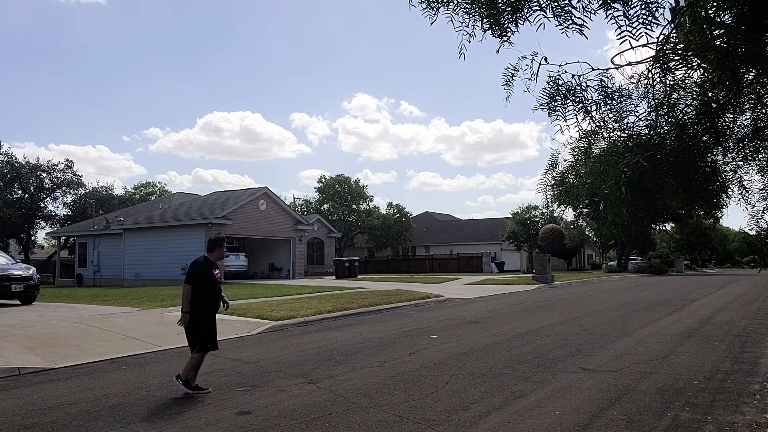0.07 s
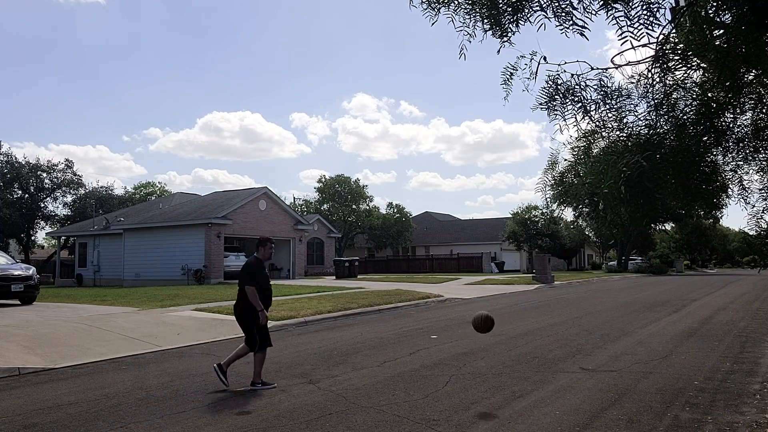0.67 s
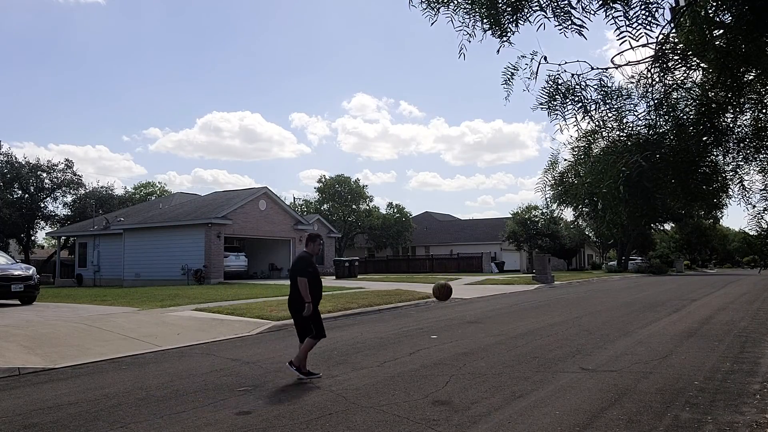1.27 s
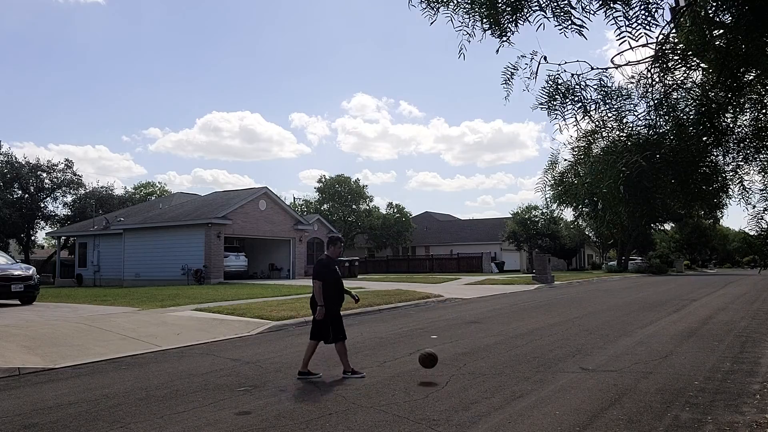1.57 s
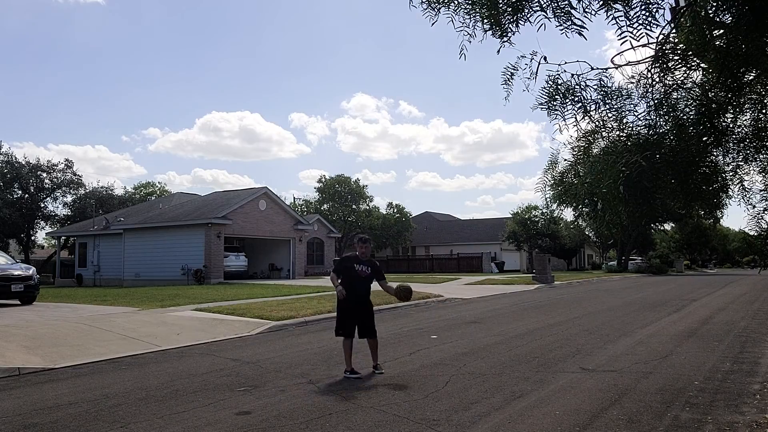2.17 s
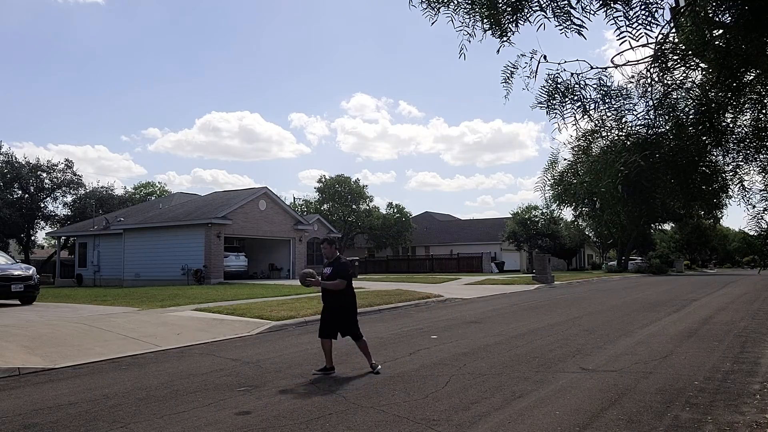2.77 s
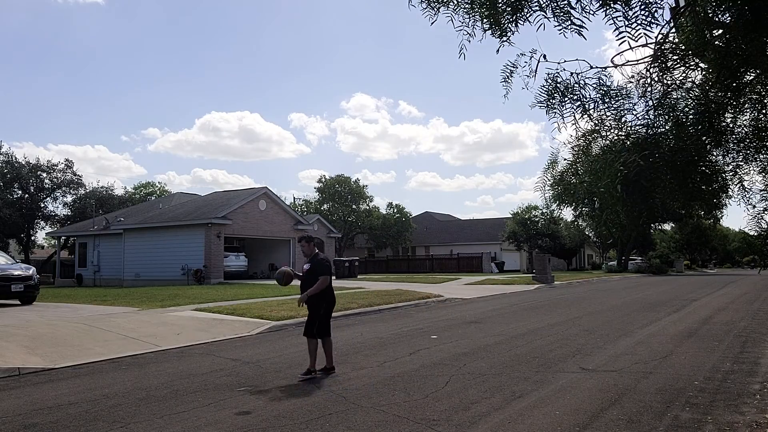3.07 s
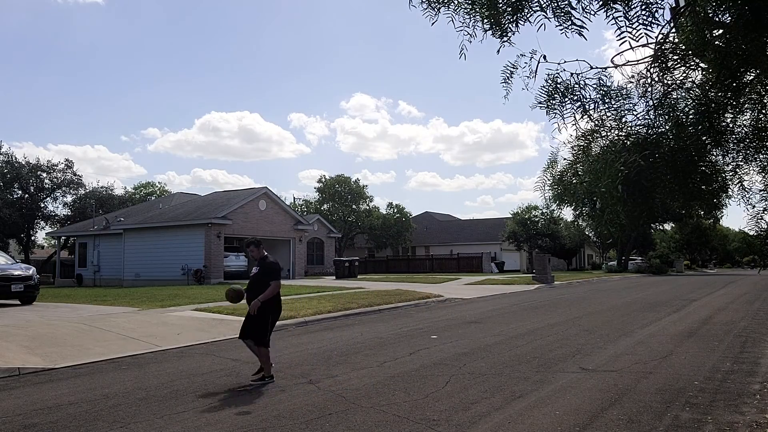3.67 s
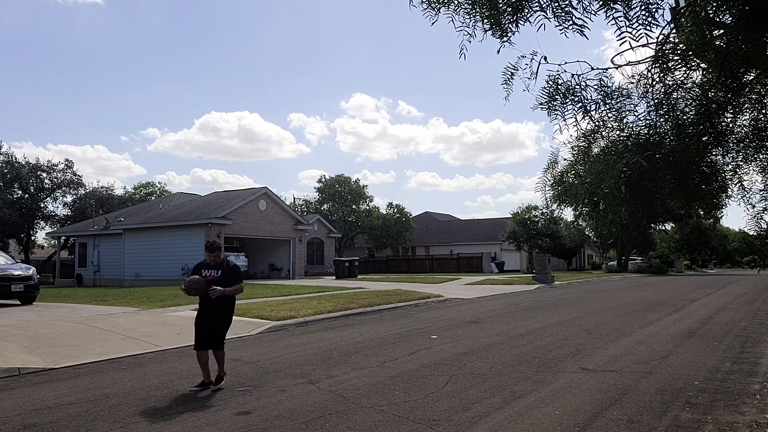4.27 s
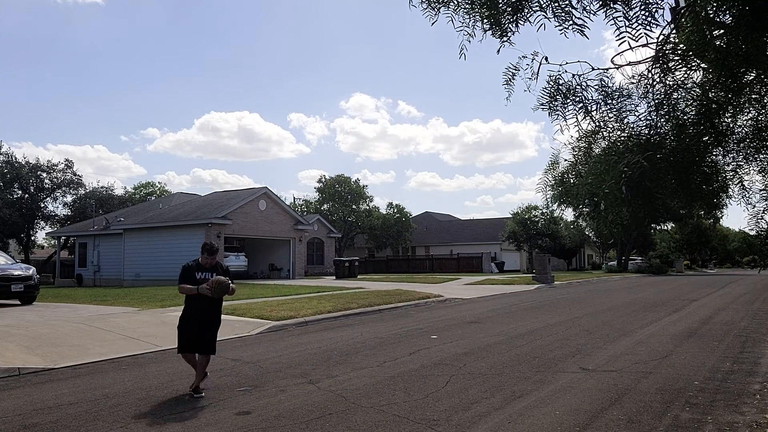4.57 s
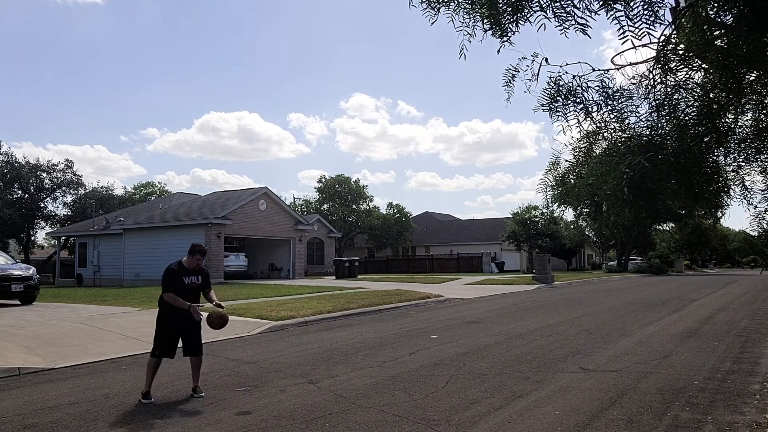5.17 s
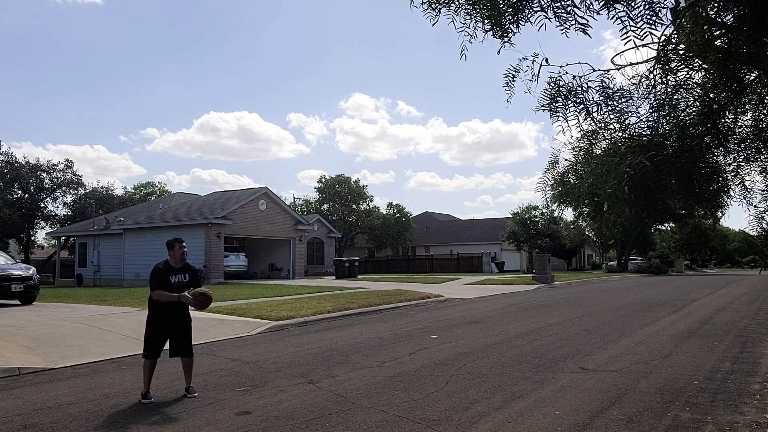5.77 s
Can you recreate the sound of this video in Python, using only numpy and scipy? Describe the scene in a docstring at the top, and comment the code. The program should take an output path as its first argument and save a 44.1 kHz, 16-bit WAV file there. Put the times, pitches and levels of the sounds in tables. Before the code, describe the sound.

Four widely spaced basketball bounces smack the pavement of a quiet residential street, with soft hand pats, faint birdsong and distant traffic.

```python
"""A quiet residential street: a basketball bounces four times on asphalt and is handled in between.
Each bounce is a slap, the thump of the squashed ball, shell modes and the ping of the air inside,
thrown back by the kerb and the house fronts. Palms pat and shoes scuff on grit.
A low background rumble swells with the boom after the first three bounces and again at the end.
Small birds chirp in the trees over a soft wash of far traffic; light gusts buffet the left microphone."""
import sys
import numpy as np
from scipy import signal
from scipy.io import wavfile

SR = 44100
rng = np.random.default_rng(int(sys.argv[2]) if len(sys.argv) > 2 else 0)


def pcm_store(signal):
    """Save signal as 16-bit PCM."""
    levels = np.round(np.clip(np.atleast_2d(signal), -1, 1) * 32767)
    wavfile.write(sys.argv[1], SR, levels.astype(np.int16).T)


N = 256220


def bounces(contact_s=0.0094, grip_s=0.0015, liftoff_db=-9, ping_re_thump_db=-26.5):
    """Ball on asphalt; contact lasts equally long however hard it lands."""
    # t/s, thump/dB, flex/dB, flex focus/Hz, slap/dB, slap/Hz, shell/dB, shell focus/Hz,
    # coarse grit/dB, fine grit/dB, left-ear lag/ms
    hits = [(0.626, -9.5, -18.5, 185, -7, 1900, -13.5, 1010, -20.5, -39.5, 0.086),
            (1.6887, -13, -21, 285, -3, 2850, -26, 1460, -42, -37, 0.044),
            (3.532, -12, -22.5, 395, -7.5, 1480, -26.5, 970, -33.5, -38, -0.048),
            (5.1018, -10, -14, 301, -8.5, 1600, -13, 1740, -22.5, -60, -0.092)]
    # damped modes of the rubber shell: f/Hz, level/dB, t60/s
    shell_modes = [(609, -6, 0.039), (729, -2, 0.044), (848, -8.5, 0.038), (978, 1, 0.024),
                   (1104, 7.5, 0.012), (1310, 3.5, 0.021), (1395, 0, 0.018), (1751, 2, 0.02),
                   (1858, -15, 0.078), (2280, -21, 0.087), (3004, -1, 0.017)]
    # slow flexing of the whole ball: f/Hz, level/dB, t60/s
    flex_modes = [(191, -0.5, 0.074), (285.7, 2, 0.045), (392, -1.5, 0.1), (456, -1, 0.059)]
    out, t = np.zeros((2, N)), seconds(.5)
    grip = 1 - np.exp(-t / grip_s)  # modes swell as the contact patch grows
    for (s, thump_db, flex_db, flex_hz, slap_db, slap_hz, shell_db, shell_hz,
         coarse_db, fine_db, lag_ms) in hits:
        impact = from_db(thump_db) * thump(t, contact_s) + from_db(slap_db) * slap(t, slap_hz)
        shell = from_db(shell_db) * grip * modes(t, shell_modes, shell_hz, focus_db=7.5)
        shell += from_db(liftoff_db) * delay(t, shell, contact_s)  # shaken again on lift-off
        flex = from_db(flex_db) * grip * modes(t, flex_modes, flex_hz, focus_db=23)
        air = from_db(thump_db + ping_re_thump_db) * grip * ping(t, slap_hz)
        coarse = from_db(coarse_db) * grit(t, hz=5430, octaves=0.45)
        fine = from_db(fine_db) * grit(t, hz=8400, octaves=1.0)
        hit = impact + shell + flex + air + coarse + fine
        add(out, s, np.array([delay(t, hit, max(ear * lag_ms, 0) / 1000) for ear in (1, -1)]))
    return out


def thump(t, contact_s, lean=0.63, press=0.08, release=0.36, wobble_db=-8):
    """The ball flattens fast and springs back slower: suction, pressure, suction, then a low wobble."""
    phase = t / contact_s
    onset = 1 - np.exp(-phase / press)
    fade = np.clip((1 - phase) / release + .5, 0, 1)
    squash = -np.cos(2 * np.pi * phase ** lean) * onset * fade
    wobble = -from_db(wobble_db) * ring(np.maximum(t - contact_s, 0), hz=74, t60_s=0.084)
    return cut(squash, 70, "high", order=1) + wobble


def slap(t, hz, top_hz=4200, t60_cycles=1.45):
    """First touch of rubber on stone: one sharp, heavily damped swing."""
    swing = cut(ring(t, hz, t60_cycles / hz), top_hz, "low", order=3)
    return swing / np.abs(swing).max()


def modes(t, table, focus_hz, focus_db):
    """Struck modes; the spot that lands decides which are driven most."""
    return sum(from_db(db) * focus(hz, focus_hz, focus_db) * ring(t, hz, t60) for hz, db, t60 in table)


def ping(t, slap_hz, split=0.0319, count=6):
    """Seams and flattening split each air mode into beating partials; those near the slap ring most."""
    # modes of the enclosed air: f/Hz, level/dB, t60/s
    air_modes = [(1054, -3, 0.15), (1460, 4, 0.071), (1810, 1.5, 0.22), (2272, -10.5, 0.24),
                 (2690, -12, 0.2), (2970, -11, 0.23), (3250, -10, 0.11), (3780, -4.5, 0.12)]
    out = 0
    for hz, db, t60_s in air_modes:
        partials_hz = hz * (1 + split * (np.linspace(-1, 1, count) + rng.uniform(-.2, .2, count)))
        gain = from_db(db) * focus(hz, slap_hz, focus_db=3) / np.sqrt(count)
        out += gain * sum(rng.choice([-1, 1]) * ring(t, f, t60_s) for f in partials_hz)
    return out


def grit(t, hz, octaves, crack_s=0.00084, crunch_s=0.015, crunch_db=-15):
    """Asphalt grains crack under the ball, then crunch on more quietly."""
    noise = rms_one(band(rng.standard_normal(len(t)), hz, octaves))
    return noise * (np.exp(-t / crack_s) + from_db(crunch_db) * np.exp(-t / crunch_s))


def handling(pat_t60_s=0.017, pat_rise_s=0.0012):
    """Palms and shoes: soft pats, and scuffs that swell quickly and fade."""
    # palms on the ball, soft footfalls: t/s, relative level/dB, f/Hz
    pats = [(2.1672, -34, 560), (2.6664, -31.5, 208), (2.67, -35, 445), (4.538, -35, 530)]
    # soles and palms rub, grit hisses: t/s, length/s, rub/dB, hiss/dB
    scuffs = [(1.064, 0.039, -64, -72.5), (2.164, 0.015, -58.5, -60), (2.293, 0.027, -49, -64.5),
              (2.664, 0.022, -51, -74), (4.551, 0.032, -59.5, -68.5)]
    out, t = np.zeros((2, N)), seconds(.2)
    for s, db, hz in pats:
        add(out, s, 2 * from_db(db) * ring(t, hz, pat_t60_s) * (1 - np.exp(-t / pat_rise_s)))
    for s, length_s, rub_db, hiss_db in scuffs:
        rub = from_db(rub_db) * friction(t, hz=1220, octaves=1.4)
        hiss = from_db(hiss_db) * friction(t, hz=5430, octaves=0.59)
        envelope = np.minimum(8 * t / length_s, 1) * np.exp(-(t / length_s) ** 2)
        add(out, s, (rub + hiss) * envelope)
    return out


def friction(t, hz, octaves, spread_db=5):
    """Uneven friction grains in one band, mostly alike in both ears."""
    noise = rng.standard_normal((2, len(t))) * from_db(spread_db * rng.standard_normal(len(t)))
    return rms_one(band(noise + 2 * noise.mean(axis=0), hz, octaves))


def street(x, scatter_db=-11, tail_db=-28, kerb_db=-17):
    """Direct sound, near scatter, a thin kerb echo, a dull smeared house echo and a faint tail."""
    # scatter off the ground and nearby things: f/Hz, relative level/dB
    scatter_spectrum = [(60, 4), (150, 5), (400, 7), (1000, 7), (2000, -2), (4000, 0), (8000, 4),
                        (15000, -6)]
    # its decay: f/Hz, t60/s
    scatter_t60 = [(60, 0.076), (300, 0.11), (1000, 0.08), (2000, 0.12), (5000, 0.18), (15000, 0.024)]
    # far reverberation: f/Hz, relative level/dB
    tail_spectrum = [(60, -11), (250, 0.5), (800, -19), (2000, 4), (4000, -2), (8000, 9.5), (15000, -28)]
    # echoes by landing spot: t/s, kerb delay/s, house delay/s, house level/dB
    echoes = [(0.626, .0305, 0.073, -29), (1.6887, 0.019, 0.065, -28.5), (3.532, 0.018, 0.09, -26.5),
              (5.102, .0225, 0.08, -24.5)]
    mono = x.mean(axis=0)
    short_waves = cut(mono, 170, "high")  # long waves pass round small things
    scatter = reverberate(short_waves, scatter_spectrum, scatter_t60, build_s=0.0054, length_s=.25)
    tail = reverberate(mono, tail_spectrum, t60s=[(100, 0.47), (2000, 0.55), (8000, 0.25)],
                       build_s=0.075, length_s=0.95)
    houses = reverberate(mono, spectrum=[(100, 0.0078), (8000, 0.0038)],
                         t60s=[(100, 0.042), (8000, 0.043)], build_s=0.0052, length_s=.1)
    houses = cut(houses, 3000, "low", order=3)
    kerb = from_db(kerb_db) * band(x, hz=2700, octaves=1.4)  # a low kerb returns only short waves
    out = x + from_db(scatter_db) * scatter + from_db(tail_db) * tail
    for s, kerb_s, house_s, house_db in echoes:
        start_s = s - .02
        bounce = slice(round(start_s * SR), round((start_s + .25) * SR))
        add(out, start_s + kerb_s, kerb[:, bounce])
        add(out, start_s + house_s, from_db(house_db) * houses[:, bounce])
    return out


def birds(end_hz=3110, upper_ratio=1.3, lower_db=-1.5, upper_db=-6, direct_db=-2, wet_db=-1):
    """Far two-voiced chirps and slightly sagging whistles, smeared by leaves and walls."""
    # falling chirps: t/s, length/s, relative level/dB
    chirp_calls = [(0.467, 0.032, -66), (0.821, 0.077, -59.5), (1.256, 0.062, -64), (1.412, 0.082, -60.5),
                   (1.944, 0.061, -60), (2.104, 0.073, -66.5), (2.449, 0.078, -59.5), (2.959, 0.042, -69),
                   (3.053, 0.057, -65), (3.167, 0.078, -61), (3.678, 0.058, -64), (4.077, 0.079, -62.5),
                   (4.767, 0.094, -58.5), (5.329, 0.085, -62)]
    # clear notes: t/s, length/s, end f/Hz, relative level/dB
    whistle_calls = [(.37, 0.11, 4710, -76), (1.36, 0.19, 6020, -71.5), (1.44, .1, 5460, -77),
                     (1.49, .18, 5880, -77.5), (3.70, 0.029, 3790, -57), (4.83, 0.033, 3920, -50),
                     (4.872, 0.038, 3150, -60)]
    lower = [(s, length_s, end_hz, db + lower_db) for s, length_s, db in chirp_calls]
    upper = [(s, length_s * .8, end_hz * upper_ratio, db + upper_db) for s, length_s, db in chirp_calls]
    chirps = song(lower, fall_oct_per_s=7.0, warble=0.03, warble_hz=346, wander=0.0357)
    chirps += song(upper, fall_oct_per_s=4.3, warble=0.025, warble_hz=348, wander=0.021)
    whistles = song(whistle_calls, fall_oct_per_s=0.15, warble=0.008, warble_hz=200, wander=0.003)
    leaves = reverberate(chirps + from_db(-10) * whistles, spectrum=[(2000, 0), (8000, 0)],
                         t60s=[(3000, .65), (6000, .45)], build_s=.015, length_s=.7)
    return from_db(direct_db) * (chirps + whistles) + from_db(wet_db) * leaves


def song(calls, fall_oct_per_s, warble, warble_hz, wander, wander_hz=45, effort_db=3):
    """Bird tones glide down to their end note with a fast warble; pitch and loudness also wander."""
    out = np.zeros((1, N))
    for s, length_s, end_hz, db in calls:
        t = seconds(length_s)
        fast, slow, effort = [rms_one(cut(rng.standard_normal(len(t)), rate_hz, "low"))
                              for rate_hz in (warble_hz, wander_hz, wander_hz)]
        glide_hz = end_hz * 2 ** (fall_oct_per_s * (length_s - t))
        hz = glide_hz * (1 + warble * fast + wander * (slow - slow.mean()))
        envelope = signal.windows.tukey(len(t), .3) * rms_one(from_db(effort_db * effort))
        add(out, s, from_db(db) * np.sqrt(2) * envelope * np.sin(2 * np.pi * np.cumsum(hz) / SR))
    return out


def background(rumble_db=-49, swell_share=0.61, wash_db=-56):
    """Steady wash; a low rumble swells with the boom after the first three bounces and at the end."""
    # rumble: f/Hz, relative density/dB
    rumble_spectrum = [(20, -6), (35, -4), (55, 5.5), (85, 4.5), (115, -2.5), (160, -23), (250, -15),
                       (600, -83)]
    # wash: f/Hz, relative density/dB
    wash_spectrum = [(50, -23), (170, 4), (280, -4), (500, -2), (750, -7.5), (1300, -7.5), (2400, -19.5),
                     (3500, -20), (5000, -31), (6800, -24), (8500, -84), (10500, -45.5), (15500, -49.5)]
    # rumble contour, scaled about its mean by swell_share: t/s, level/dB
    contour = [(0.0, -49), (0.31, -56.5), (0.68, -50), (1.28, -55), (1.76, -48), (3.23, -53.5), (3.67, -49),
               (4.09, -52), (5.8, -48)]
    t = np.arange(N) / SR
    s, db = np.transpose(contour)
    swell_db = swell_share * np.interp(t, s, db - db.mean())
    rumble = from_db(rumble_db + swell_db) * stereo_noise(rumble_spectrum, t)
    return rumble + from_db(wash_db) * stereo_noise(wash_spectrum, t)


def breeze(band_hz=(35, 100)):
    """Light gusts buffet the left microphone port."""
    # gusts: peak t/s, 1/e half-width/s, level/dB
    gusts = [(2.042, 0.39, -44), (5.757, 0.091, -43)]
    t = np.arange(N) / SR
    strength = sum(from_db(db) * np.exp(-((t - s) / width_s) ** 2) for s, width_s, db in gusts)
    return strength * rms_one(cut(rng.standard_normal(N), band_hz, "band")) * [[1], [0]]


def reverberate(x, spectrum, t60s, build_s, length_s):
    """Many weak reflections build up and die away; unit-energy response."""
    t = seconds(length_s)
    build = 1 - np.exp(-(t / build_s) ** 2)
    response = rms_one(stereo_noise(spectrum, t, t60s) * build) / np.sqrt(len(t))
    return signal.fftconvolve(np.atleast_2d(x), response, axes=1)[:, :N]


def stereo_noise(spectrum, t, t60s=None):
    """Diffuse unit-rms noise in third octaves; spectrum: f/Hz, level/dB; t60s: f/Hz, t60/s."""
    # the ears hear the bass alike: f/Hz, left-right correlation
    likeness = [(30, 0.66), (80, 1), (250, 0.86), (600, 0.44), (1200, 0), (2500, 0), (8000, 0.017),
                (15000, 0)]
    out, edges_hz = 0, 20 * 2 ** (np.arange(30) / 3)
    white = rng.standard_normal((2, 2, len(t) + SR // 10))
    for k, (low, high) in enumerate(zip(edges_hz, edges_hz[1:])):
        mid, side = cut(white[k % 2], [low, high], "band")[:, -len(t):]
        hz = np.sqrt(low * high)
        alike = at_hz(likeness, hz)
        decay_db = 60 * t / at_hz(t60s, hz) if t60s else 0
        gain = from_db(at_hz(spectrum, hz) - decay_db)
        out += gain * (np.sqrt(1 + alike) * mid + np.sqrt(1 - alike) * side * [[1], [-1]])
    return rms_one(out)


def ring(t, hz, t60_s):
    """Struck mode; starts with a pressure drop."""
    return -np.sin(2 * np.pi * hz * t) * from_db(-60 * t / t60_s)


def focus(hz, focus_hz, focus_db):
    """Mode gain: falls by focus_db over the first octave away from the most driven pitch."""
    return from_db(-focus_db * min(abs(np.log2(hz / focus_hz)), 1))


def band(x, hz, octaves):
    """Band-pass around a centre."""
    half = 2 ** (octaves / 2)
    return cut(x, [hz / half, hz * half], "band")


def cut(x, hz, kind, order=2):
    """Causal Butterworth filter."""
    return signal.sosfilt(signal.butter(order, hz, kind, fs=SR, output="sos"), x + 1e-18)


def delay(t, x, s):
    """Delay by s seconds, interpolated."""
    return np.interp(t - s, t, x, left=0)


def add(out, s, sound):
    """Mix a sound in at time s."""
    i = round(s * SR)
    out[:, i:i + sound.shape[-1]] += sound[..., :N - i]


def at_hz(points, hz):
    """Read a table on a log-frequency axis."""
    table_hz, values = np.transpose(points)
    return np.interp(np.log(hz), np.log(table_hz), values)


def from_db(db):
    """Decibels to gain."""
    return 10 ** (np.asarray(db) / 20)


def rms_one(x):
    """Scale to unit rms."""
    return x / np.sqrt(np.mean(x ** 2) + 1e-20)


def seconds(length_s):
    """Time axis."""
    return np.arange(int(length_s * SR)) / SR


def scene():
    """Player and ball in the street; birds, rumble, wash and a breeze around them."""
    return street(bounces() + handling()) + birds() + background() + breeze()


def record(dry, tilt_db=-14, cutoff_hz=15700):
    """The left microphone is a little brighter; peaks are rounded and the top is cut."""
    treble = from_db(tilt_db) * cut(dry, [1700, 6000], "band", order=1)
    rounded = np.tanh(dry + treble * [[1], [-1]])
    return signal.sosfilt(signal.ellip(10, .1, 80, cutoff_hz, fs=SR, output="sos"), rounded)


dry = scene()
out = record(dry)
pcm_store(out)
```